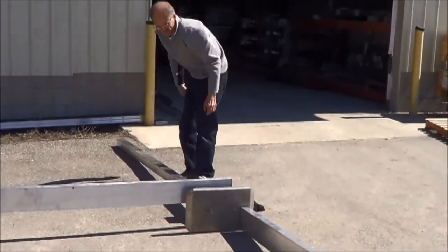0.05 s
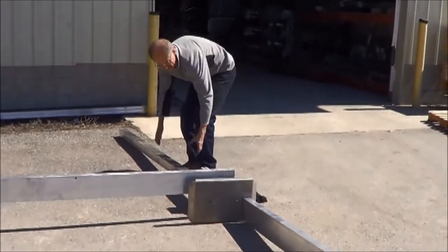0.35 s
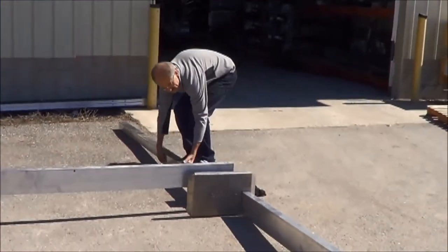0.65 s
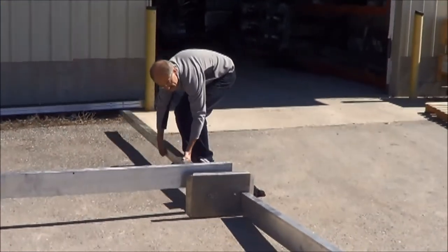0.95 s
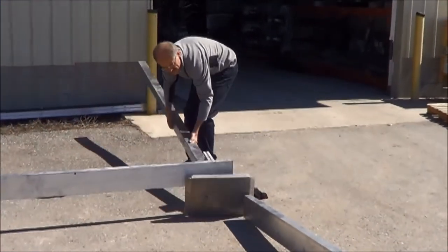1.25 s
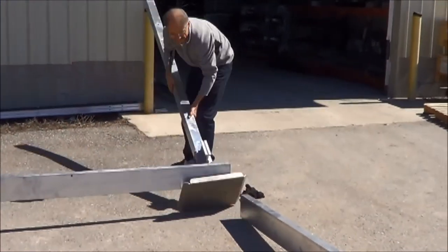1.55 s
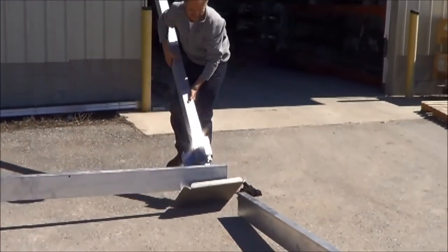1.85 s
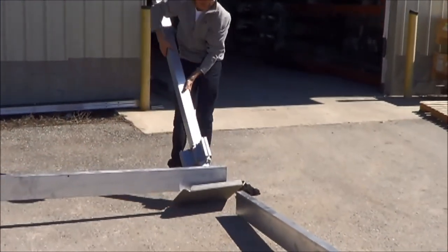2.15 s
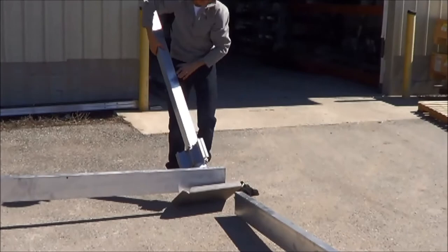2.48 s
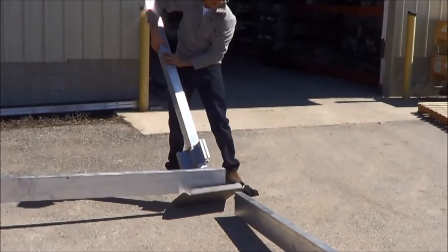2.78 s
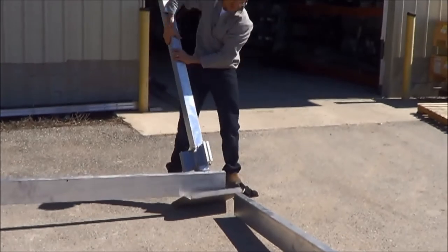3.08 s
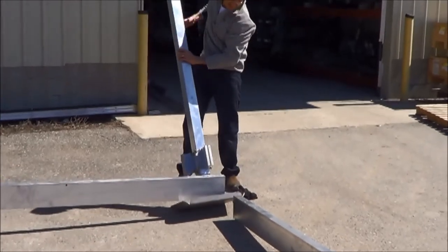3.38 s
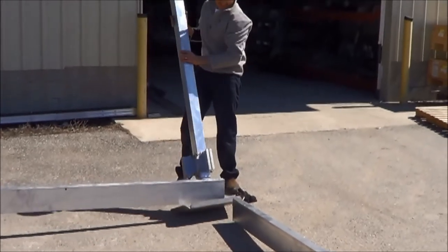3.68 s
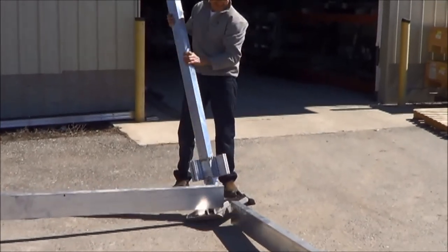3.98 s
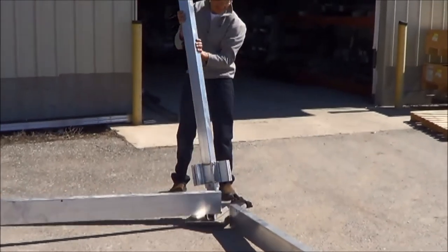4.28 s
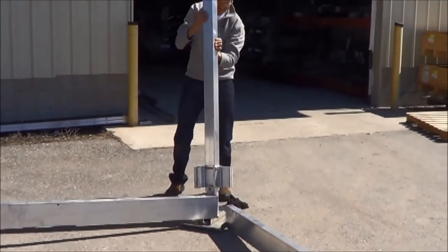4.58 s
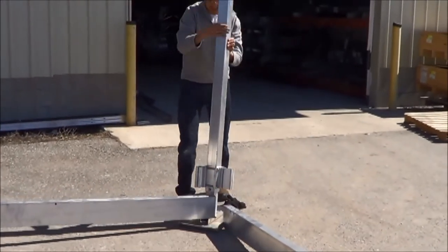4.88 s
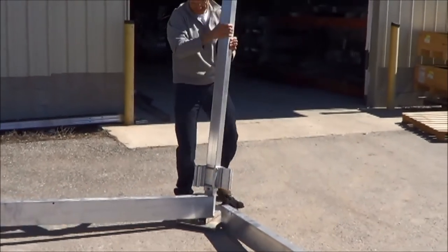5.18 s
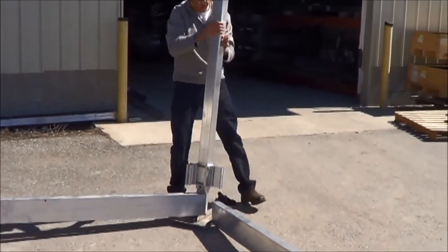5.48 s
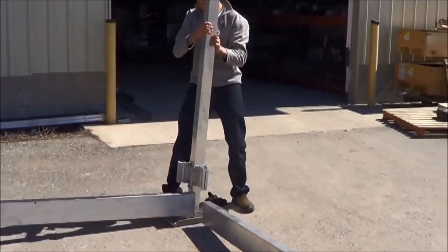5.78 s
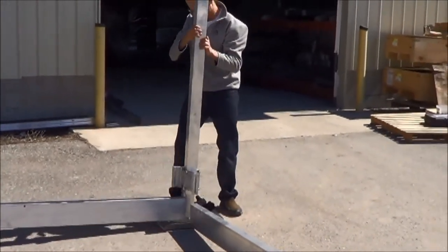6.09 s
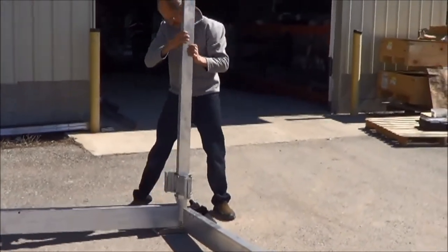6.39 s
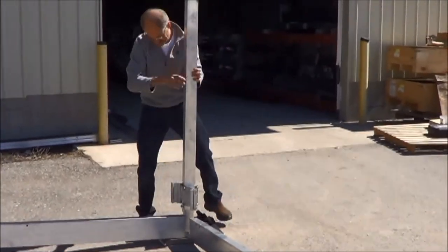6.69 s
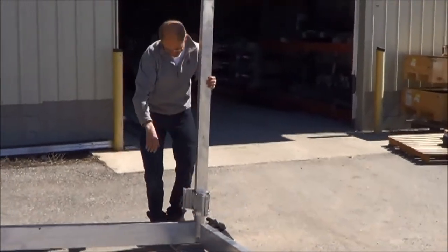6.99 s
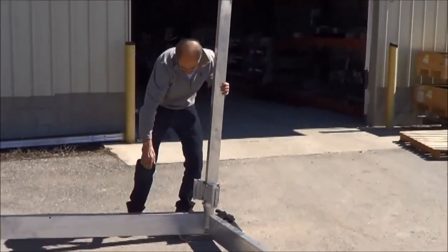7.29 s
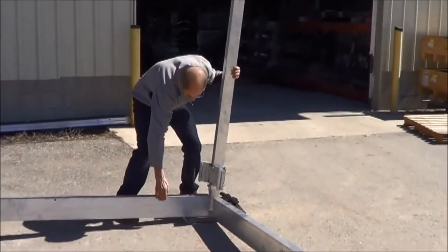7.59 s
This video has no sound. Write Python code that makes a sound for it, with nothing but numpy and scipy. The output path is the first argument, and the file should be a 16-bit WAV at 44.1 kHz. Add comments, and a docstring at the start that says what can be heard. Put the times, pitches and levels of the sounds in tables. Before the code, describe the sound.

A hollow metal post clanks, scrapes and squeals against a metal frame in two bouts, then rings on over a faint workshop hum.

```python
"""A faint workshop hum over a concrete yard, then clanks: a hollow metal post is lifted, dragged
and fitted into the bracket of a lying frame. Blows and juddering friction ring the metal's modes;
sticking edges squeal, single tube tones swell, sharp knocks chirp along a beam. Between moves,
clothes swish, metal rattles lightly and grit cracks underfoot. Once the post is seated,
the frame's long beams ring on."""
import sys
import numpy as np
from scipy import signal
from scipy.fft import rfft, irfft
from scipy.io import wavfile
from scipy.ndimage import uniform_filter1d

SR = 44100
rng = np.random.default_rng(int(sys.argv[2]) if len(sys.argv) > 2 else 0)


def master_out(mix):
    """Clip the mix to full scale and print it as 16-bit PCM to the path in sys.argv[1]."""
    frames = np.transpose(np.atleast_2d(mix))
    ceiling = np.clip(frames, -1, 1)
    pcm = np.round(ceiling * 32767).astype(np.int16)
    wavfile.write(sys.argv[1], SR, pcm)


N = 337365
TIME_S = np.arange(N) / SR

# yard air over time: time_s, level_db
YARD_LEVELS = [(0, -40.5), (.7, -38), (.85, -38.5), (2.4, -48.5), (3, -46), (3.7, -45), (5.3, -42),
               (7, -45), (7.65, -43.5)]
# yard air spectrum: freq_hz, density_db
YARD_SPECTRUM = [(30, -21), (108, -7.5), (210, 2), (350, 2), (430, -3), (970, -3.5), (1300, -6), (2300, -6),
                 (3900, -13.5), (8500, -14.5), (13000, -19), (15700, -11)]
# distant machine whine: time_s, level_db
WHINE_LEVELS = [(0, -52.5), (.8, -57), (2.6, -57.5), (3.6, -53.5), (5.4, -49), (7, -51), (7.45, -50),
                (7.65, -49)]
# stereo width of noise: freq_hz, side_minus_mid_db
STEREO_WIDTH = [(100, -23), (300, -10), (1000, -11), (2000, -13), (4500, -10), (8000, -6), (12000, -35)]
# metal on metal, dull when seating, bright edge on edge: start_s, level_db, brightness_db
BLOWS = [ (0.561, -50.5, -11), (0.888, -33, -12), (0.919, -15, -0.5), (1.042, -27, -6.5),
         (1.066, -19.5, 5.5), (1.095, -26.5, -9.5), (1.103, -18.5, 6.5), (1.147, -21.5, -11.5),
         (1.158, -14.5, 4.5), (1.21, -15, -9), (1.271, -27, 10), (1.319, -16.5, -4.5), (1.354, -26, 12.5),
         (1.48, -23, -8), (1.578, -20.5, 5.5), (1.871, -20.5, 6.5), (2.065, -36, 0), (2.093, -35, 0),
         (2.167, -39.5, 4.5), (2.753, -39, 0), (2.814, -38, -4), (2.842, -39, -1), (3.399, -40.5, -2),
         (3.459, -42, 0.5), (3.852, -17.5, -4), (3.861, -15, 2), (3.96, -15.5, 0.5), (4.02, -19.5, 4.5),
         (4.072, -16, 0), (4.149, -18.5, 3.5), (4.168, -23.5, -11.5), (4.213, -23, -3),
         (4.281, -19.5, -3.5), (4.362, -17, -2.5), (4.516, -21, -7), (4.539, -16, -1.5), (4.684, -13.5, 1),
         (4.942, -32.5, -5.5), (5.0, -31.5, 1), (5.33, -49.5, -11.5), (5.537, -29.5, -1.5),
         (5.589, -26.5, 4), (5.63, -25, 4), (5.675, -14.5, 1.5), (5.743, -13.5, 1.5), (6.008, -14, -0.5),
         (6.078, -17, 0), (6.103, -22.5, 7.5), (6.162, -15, -3), (6.241, -15.5, 5), (6.469, -16.5, -4),
         (6.699, -30, -6.5)]
# bounds of the metal's four registers: edge_hz
REGISTERS_HZ = [125, 800, 3000, 9000, 17000]
# tilt per register, low to top: gain_db_per_brightness_db
REGISTER_TILT = (-1.27, -0.53, 0.38, 1.64)
# tube walls, damped lying, freer standing: time_s, gain_db
WALL_GAINS = [(.9, -2), (1.45, -1.5), (1.75, 0.5), (3.85, 0.5), (4.6, 1), (5.6, 2.5), (6.2, .5), (6.5, 4.5)]
# spectrum of the frame's weak modes: freq_hz, density_db
CROWD_SPECTRUM = [(100, -41), (160, -14), (240, -11), (470, -5.5), (680, -1), (1000, 3), (1420, -1.5),
                  (1800, 3), (2300, -1), (3000, -4.5), (4300, -9.5), (8400, -11.5), (11000, -17.5),
                  (15700, -25.5)]
# decay of the weak modes: freq_hz, t60_s
CROWD_DECAY = [(150, 0.83), (500, 0.76), (1100, 0.48), (2000, 0.44), (3200, 0.46), (9000, 0.31),
               (15000, 0.2)]
# the frame's strongest modes: pitch_hz, level_db, t60_s
STRONG_MODES = [(308.3, -23, 1.5), (560, -13, 0.65), (642.3, -11.5, 0.17), (721, -16, 0.86),
                (760, -49, 1.8), (912, -18, 1.1), (1035, -22.5, 1.2), (1165, -23, 1.46),
                (1755, -15.5, 0.21), (2000, -17.5, 0.46), (2188, -16.5, 0.33), (2530, -27.5, 1.05),
                (3740, -51, 0.35), (4020, -16.5, 0.09), (6800, -24, 0.4), (7978, -38, 0.17),
                (8260, -11, 0.11), (8500, -19, .22), (8770, -18, 0.2), (9730, -32, 0.042),
                (10100, -29, 0.127)]
# metal slides on metal: start_s, length_s, level_db, drop_db, brightness_db
SLIDES = [(1.157, 0.21, -17.5, 7, 0.7), (1.363, 0.077, -17.5, 3, 2.5), (1.469, 0.17, -12.5, 4.5, 0.7),
          (1.659, 0.21, -12, 3.5, -1.3), (3.906, 0.058, -22.5, 8, -10), (3.975, .13, -15.5, 5, -2),
          (4.15, 0.06, -19.5, 3, -1.5), (4.366, 0.098, -26.5, -2, 0.2), (4.554, 0.26, -21, 10.5, -1.9),
          (5.554, 0.1, -23, 8.5, -0.5), (5.669, 0.19, -15.5, -1, -1.2), (6.024, 0.089, -18.5, 0, -0.7),
          (6.159, .14, -11.5, 9, -0.5)]
# an edge sticks and sings: start_s, level_db, pitch_hz, t60_s
EDGE_SQUEALS = [(1.157, 0.5, 7100, 0.18), (1.219, -13, 5800, 0.21), (1.318, -19, 5800, 0.13),
                (1.36, -14, 4900, 0.16), (1.442, 0.5, 8360, 0.29), (1.448, -4, 9600, 0.29),
                (1.50, -8, 8100, 0.16), (1.505, -16, 4870, 0.21), (1.54, -9, 8000, .15),
                (2.753, -25, 5000, 0.13), (4.183, -11, 6550, 0.15), (4.211, -5, 6520, 0.11),
                (4.281, -7.5, 6580, 0.11), (4.361, -10.5, 6650, 0.23), (4.575, -6.5, 6830, 0.18),
                (4.615, -5.5, 6720, 0.12), (4.73, -3.5, 6760, 0.075), (4.774, -12, 6650, .13)]
# arm and leg moves: peak_s, level_db, swell_s
CLOTH_SWISHES = [(3.19, -47.5, .09), (3.46, -44, 0.048), (3.74, -47, 0.12), (5.23, -40, 0.04),
                 (6.619, -41.5, .13), (7.335, -34, .07)]
# cloth hiss: freq_hz, density_db
CLOTH_SPECTRUM = [(2000, -32), (4000, -1), (5500, 8), (8000, 8), (13000, 6), (16000, 1.5)]
# small sharp ticks, a light metal rattle and grit underfoot: start_s, level_db, centre_hz
TICKS = [(3.386, -32, 6000), (3.40, -34, 2980), (3.459, -30, 4000), (3.469, -25.5, 4500),
         (5.021, -25, 5600), (5.112, -34, 5360), (5.427, -33, 4800), (7.157, -33, 5000),
         (7.538, -25.5, 6200), (7.589, -26.5, 2760)]
# single tube tones, brief at blows, longer while rubbing: peak_s, pitch_hz, level_db, swell_s
TUBE_TONES = [(3.858, 726, -15.5, 0.0094), (4.06, 936, -17, 0.073), (4.062, 1166, -19, 0.054),
              (4.618, 304.5, -28.5, 0.14), (5.59, 618, -21, 0.016), (5.84, 780, -22, 0.053),
              (5.921, 1020, -16.5, 0.052), (6.179, 701, -14.5, 0.022), (6.326, 1017, -18, 0.069)]
# sharp knocks on a beam: start_s, level_db
BEAM_KNOCKS = [(4.158, -17), (4.3448, -1), (4.509, -17)]
# long beams of the joined frame: pitch_hz, level_db, t60_s
SEATED_MODES = [(405.5, -20, 1.4), (703, -29, 2.5), (764, -23.5, 1.5), (864, -28, 2.6), (921, -26, 2.6),
                (1012, -24, 2.2), (1068, -22.5, 2.8), (1140, -29, 2.4), (1310, -27.5, 2.9),
                (1680, -30, 1.8), (1863, -26, 2.4), (2040, -29, 1.8), (2198, -25.5, 1.8)]


def from_db(db):
    """Decibels to gain."""
    return np.exp(np.asarray(db) * (np.log(10) / 20))


def unit_rms(x):
    """Scale to rms 1."""
    return x / np.sqrt(np.mean(x ** 2) + 1e-20)


def at_hz(table, hz):
    """Read a table on a log-frequency axis."""
    freq_hz, value = np.transpose(table)
    return np.interp(np.log(np.maximum(hz, 1)), np.log(freq_hz), value)


def over_time(table):
    """Read a table at every sample."""
    return np.interp(TIME_S, *np.transpose(table))


def drift(rate_hz):
    """Straight lines between unit Gaussian draws."""
    knots = rng.standard_normal(4000)
    return np.interp(TIME_S * rate_hz, np.arange(len(knots)), knots)


def decay(t, t60_s):
    """Fall of 60 dB per t60_s."""
    return np.exp(-np.log(1000) * t / t60_s)


def stereo_noise(spectrum, size=N):
    """Coloured noise, nearly alike in both channels; rms 1."""
    hz = np.fft.rfftfreq(size, 1 / SR)
    mid, side = rfft(rng.standard_normal((2, size))) * from_db(at_hz(spectrum, hz))
    side = side * from_db(at_hz(STEREO_WIDTH, hz))
    return unit_rms(irfft([mid + side, mid - side], size))


def band(x, low_hz, high_hz, order=2):
    """Causal band-pass."""
    sos = signal.butter(order, [low_hz, min(high_hz, .45 * SR)], "band", fs=SR, output="sos")
    return signal.sosfilt(sos, x)


def resonate(x, hz, width_hz):
    """One resonance, peak gain 1."""
    radius = np.exp(-np.pi * width_hz / SR)
    feedback = [1, -2 * radius * np.cos(2 * np.pi * hz / SR), radius ** 2]
    return signal.lfilter(np.array([1, 0, -1]) * (1 - radius ** 2) / 2, feedback, x + 1e-18)


def ring(force, hz, t60_s):
    """One mode, impulse response of energy 1."""
    width_hz = np.log(1000) / (np.pi * t60_s)
    return resonate(force, hz, width_hz) * np.sqrt(SR / (np.pi * width_hz))


def add(out, start_s, sound):
    """Mix a short sound in at start_s."""
    start = max(round(start_s * SR), 0)
    part = out[..., start:start + sound.shape[-1]]
    part += sound[..., :part.shape[-1]]


def yard(waver_db=1.5, whine_hz=1542, width_hz=45):
    """Open-air rumble and hiss, with a distant machine's narrow whine."""
    air = from_db(over_time(YARD_LEVELS) + waver_db * drift(rate_hz=8.5)) * stereo_noise(YARD_SPECTRUM)
    whine = resonate(rng.standard_normal(N), whine_hz, width_hz)
    whine = resonate(whine, whine_hz, 2 * width_hz)
    return air + from_db(over_time(WHINE_LEVELS)) * unit_rms(whine)


def tilted_db(level_db, brightness_db, register):
    """Contact level in one register: a bright contact gains treble, loses body."""
    return level_db + brightness_db * REGISTER_TILT[register]


def blows(register, chatter_db=-17, chatter_t60_s=0.035):
    """Force of each blow: one hard contact, then chatter as the parts settle."""
    out, t = np.zeros(N), TIME_S[:SR // 20]
    for start_s, level_db, brightness_db in BLOWS:
        force = from_db(chatter_db) * rng.standard_normal(len(t)) * decay(t, chatter_t60_s)
        force *= rng.random(len(t)) < .3
        force[0] = 1
        gain = from_db(tilted_db(level_db, brightness_db, register))
        add(out, start_s, gain * force / np.linalg.norm(force))
    return out


def tap_response(low_hz, high_hz, crack_db=4, crack_t60_s=0.075, linger_db=-25, linger_t60_s=2.5):
    """One register of the tapped frame: a crack, then a crowd of modes; energy 1 per channel."""
    t, hz = TIME_S[:SR], np.fft.rfftfreq(SR, 1 / SR)
    spectrum = rfft(stereo_noise(CROWD_SPECTRUM, size=SR))
    edges_hz, crowd = np.geomspace(low_hz, high_hz, num=6), 0
    for low, high in zip(edges_hz, edges_hz[1:]):
        t60_s = at_hz(CROWD_DECAY, np.sqrt(low * high))
        fade = decay(t, t60_s) + from_db(crack_db) * decay(t, crack_t60_s)
        if 500 < low < 2000:   # wall modes linger
            fade += from_db(linger_db) * decay(t, linger_t60_s)
        crowd = crowd + irfft(spectrum * ((hz >= low) & (hz < high)), SR) * fade
    return unit_rms(band(crowd, low_hz * .85, high_hz * 1.15, order=3)) / np.sqrt(SR)


def mode_crowd(force, low_hz, high_hz, wander_hz=9):
    """The contact wanders between two spots, each with its own ring."""
    place_rad = np.pi / 2 * drift(wander_hz)
    return sum(signal.fftconvolve((force * share)[None], tap_response(low_hz, high_hz), axes=1)[:, :N]
               for share in (np.cos(place_rad), np.sin(place_rad)))


def strong_modes(force, low_hz, high_hz, shift_db=7, shift_hz=14):
    """The moving contact feeds now one mode, now another."""
    out = 0
    for hz, level_db, t60_s in STRONG_MODES:
        if low_hz <= hz < high_hz:
            coupling = unit_rms(from_db(shift_db * np.tanh(drift(shift_hz))))
            out = out + from_db(level_db) * ring(force * coupling, hz, t60_s)
    return out


def frame(blow_db=(24.5, 29, 27, 22), scrape_db=(-4, 1.5, -1.5, -7.5), judder_db=4, grind_db=-8):
    """Blows and juddering slides drive the same metal in four registers, low to top."""
    judder = unit_rms(from_db(judder_db * drift(rate_hz=55)))
    catches = slips(rate_hz=110, spread_db=9.5)
    grinding = from_db(grind_db) * slips(rate_hz=1800, spread_db=13)
    rasp = unit_rms(catches + grinding)
    screech = .6 * (rasp + chinks())
    out, wall_db = 0, over_time(WALL_GAINS)
    for register, (low_hz, high_hz) in enumerate(zip(REGISTERS_HZ, REGISTERS_HZ[1:])):
        friction = judder * (rasp if register < 2 else screech)
        scrape = from_db(scrape_db[register]) * slide_pressure(register) * friction
        force = scrape + from_db(blow_db[register]) * blows(register)
        if register == 0:   # damped walls thud more
            force *= from_db(-wall_db / 2)
        if register == 1:   # free walls ring more
            force *= from_db(wall_db)
            out = out + seated_beams(force)
        out = out + mode_crowd(force, low_hz, high_hz) + strong_modes(force, low_hz, high_hz)
    return out


def slide_pressure(register, attack_s=0.011, release_t60_s=0.12):
    """The parts break loose at once, mostly lose force, then grind to a halt."""
    out, t = np.zeros(N), TIME_S[:SR]
    for start_s, length_s, level_db, drop_db, brightness_db in SLIDES:
        attack = np.minimum(t / attack_s, 1)
        hold_db = tilted_db(level_db, brightness_db, register) - drop_db * np.minimum(t / length_s, 1)
        release = decay(np.maximum(t - length_s, 0), release_t60_s)
        add(out, start_s, attack * from_db(hold_db) * release)
    return out


def slips(rate_hz, spread_db):
    """One surface catches on the other, uneven in spacing and size; rms 1."""
    at = np.cumsum(rng.uniform(.2, 1.8, 20000) * SR / rate_hz).astype(int)
    sizes = from_db(spread_db * rng.uniform(-1, 1, len(at))) * rng.choice([-1, 1], len(at))
    return unit_rms(np.bincount(at[at < N], sizes[at < N], minlength=N))


def chinks(count=6000, spread_db=14, low_hz=4500, span_hz=11000):
    """Each new contact spot starts its own short, high resonance; rms 1."""
    out, t = np.zeros(N), TIME_S[:SR // 32]
    fade = decay(t, t60_s=.035)
    for when, pitch, size in rng.random((count, 3)):
        hz = low_hz + span_hz * pitch
        add(out, when * N / SR, from_db(spread_db * size) * np.sin(2 * np.pi * hz * t) * fade)
    return unit_rms(out)


def squeals(gain_db=-10, attack_s=0.00097):
    """A stick-slip burst feeds a cluster of high modes, which rings out."""
    out, t = np.zeros(N), TIME_S[:SR // 4]
    for start_s, level_db, hz, t60_s in EDGE_SQUEALS:
        swell = (1 - np.exp(-t / attack_s)) * decay(t, t60_s)
        tone = resonate(rng.standard_normal(len(t)), hz, width_hz=170)
        tone = unit_rms(resonate(tone, hz, width_hz=1600))
        add(out, start_s, from_db(level_db + gain_db) * tone * swell / swell.max())
    return out


def clothes(gain_db=-2, flutter_db=1):
    """Cloth slides over cloth: a soft hiss swells and fades."""
    motion = sum(from_db(level_db) * np.exp(-((TIME_S - peak_s) / swell_s) ** 2)
                 for peak_s, level_db, swell_s in CLOTH_SWISHES)
    return motion * stereo_noise(CLOTH_SPECTRUM) * from_db(gain_db + flutter_db * drift(rate_hz=40))


def ticks(gain_db=3, tail_db=-17):
    """A light metal rattle, and grit underfoot: each tick is a dry snap with a duller tail."""
    out, t = np.zeros(N), TIME_S[:SR // 10]
    for start_s, level_db, hz in TICKS:
        snap = band(rng.standard_normal(len(t)), hz * .6, hz * 1.5, order=1)
        snap = unit_rms(band(snap, 600, 11000)) * decay(t, t60_s=.012)
        tail = unit_rms(band(rng.standard_normal(len(t)), 700, 6000, order=1)) * decay(t, t60_s=.1)
        add(out, start_s, from_db(level_db + gain_db) * (snap + from_db(tail_db) * tail))
    return out


def tube_tones():
    """Single wavering tube modes: brief rings at blows, longer swells while rubbing."""
    out = np.zeros(N)
    for peak_s, hz, level_db, swell_s in TUBE_TONES:
        near = np.abs(TIME_S - peak_s) < 3 * swell_s
        t, waver_rad = TIME_S[near], drift(rate_hz=45)[near]
        swell = np.exp(-((t - peak_s) / swell_s) ** 2)
        out[near] += from_db(level_db) * swell * unit_rms(np.sin(2 * np.pi * hz * t + waver_rad))
    return out


def zings(travel_at_1khz_s=0.013, scatter_db=-27, scatter_t60_s=0.16):
    """Higher bending waves run faster: a knock arrives as a falling chirp, then its reflections."""
    out, t = np.zeros(N), TIME_S[:SR // 10]
    hz = np.fft.rfftfreq(len(t), 1 / SR)
    lag_rad = 4 * np.pi * travel_at_1khz_s * np.sqrt(1000 * hz)
    chirp = band(irfft(np.exp(-1j * lag_rad)), low_hz=2300, high_hz=4600, order=3)
    for start_s, level_db in BEAM_KNOCKS:
        paths = from_db(scatter_db) * rng.standard_normal(len(t)) * decay(t, scatter_t60_s)
        paths[0] = 1
        add(out, start_s, from_db(level_db) * signal.fftconvolve(chirp / np.abs(chirp).max(), paths))
    return out


def seated_beams(force, seated_s=6.16):
    """Once seated, the post passes its force to the long beams, which hum on."""
    passed_on = force * (TIME_S >= seated_s)
    return sum(from_db(level_db) * ring(passed_on, hz, t60_s) for hz, level_db, t60_s in SEATED_MODES)


def scene():
    """All the work happens straight ahead."""
    return frame() + squeals() + tube_tones() + zings() + ticks() + clothes() + yard()


def record(dry, threshold_db=-13, cut_db_per_db=0.26, ceiling=1.15, cutoff_hz=15800):
    """Gain control holds loud scraping down; peaks are rounded, the top is cut."""
    power = np.abs(uniform_filter1d(np.mean(dry ** 2, axis=0), size=500))
    excess_db = np.maximum(10 * np.log10(power + 1e-12) - threshold_db, 0)
    held = dry * from_db(-cut_db_per_db * excess_db)
    rounded = ceiling * np.tanh(held / ceiling)
    return signal.sosfilt(signal.ellip(12, .1, 80, cutoff_hz, fs=SR, output="sos"), rounded)


dry = scene()
out = record(dry)
master_out(out)
```